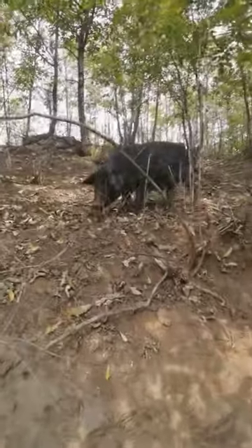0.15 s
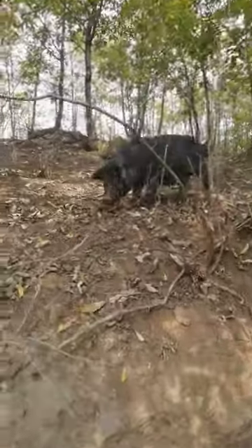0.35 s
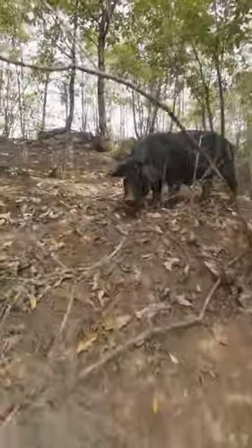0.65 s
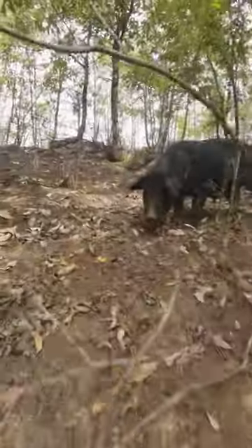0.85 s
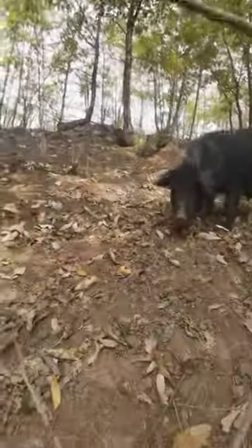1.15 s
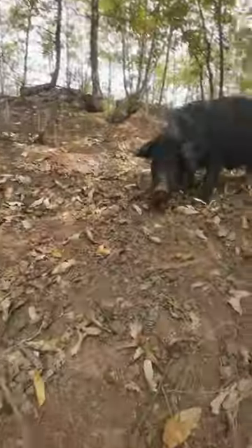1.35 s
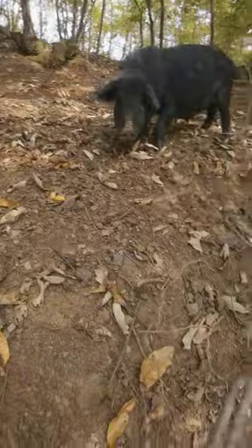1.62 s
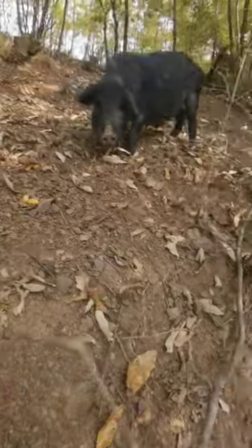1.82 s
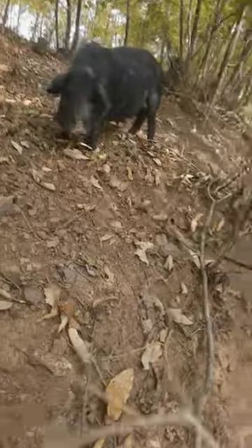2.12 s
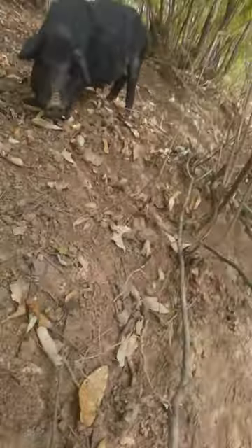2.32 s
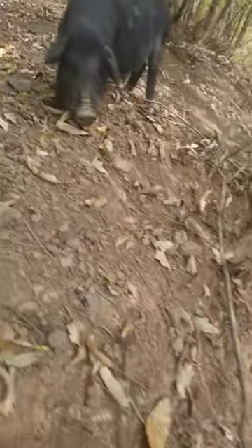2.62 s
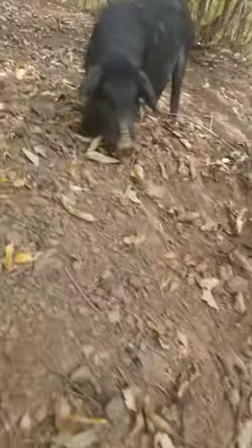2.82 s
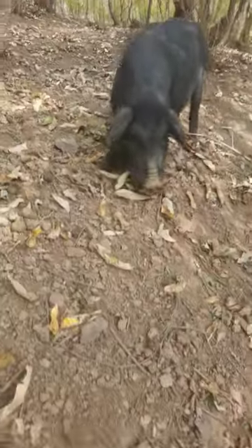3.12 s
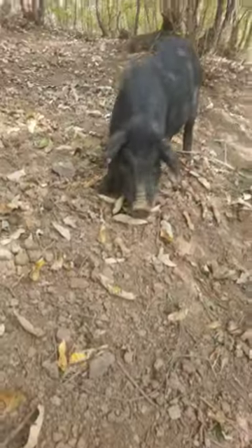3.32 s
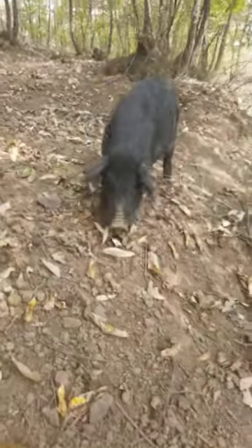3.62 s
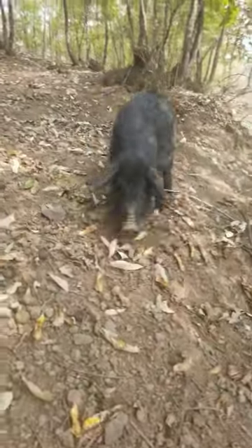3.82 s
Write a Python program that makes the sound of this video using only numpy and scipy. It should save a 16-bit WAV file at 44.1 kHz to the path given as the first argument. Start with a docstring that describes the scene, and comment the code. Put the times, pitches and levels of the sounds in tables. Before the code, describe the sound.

Short, clipped pig grunts, one and later a pair, over scuffing steps in dry forest leaves; sharp crackles cluster midway and again at the end, heard close, in stereo, with almost no reverberation.

```python
"""A pig grunts three times close by: soft flaps of the throat, then a sharp snap and a second one
ring throat and snout, breath flutters through both and the chest booms.
Dry leaves rustle and crack under feet: shaped noise with crumbling grains, scuff swells and short bursts.
Twigs knock and soft thuds fall as decaying sines; a low rumble of filtered noise rises and falls."""
import sys
import numpy as np
from scipy import signal
from scipy.fft import rfft, irfft
from scipy.io import wavfile
from scipy.ndimage import uniform_filter1d, map_coordinates

SR = 44100
rng = np.random.default_rng(int(sys.argv[2]) if len(sys.argv) > 2 else 0)


def attenuation_scalar(level_db):
    """Turn a level in dB into a linear amplitude multiplier (20 dB per decade)."""
    decades = np.asarray(level_db, float) / 20
    return 10 ** decades


def to_wav(s):
    """Save 16-bit WAV."""
    ch = np.atleast_2d(s).T  # columns
    pcm = np.round(np.clip(ch, -1, 1) * 32767)  # PCM
    wavfile.write(sys.argv[1], SR, pcm.astype(np.int16))


N = 174195
T = np.arange(N) / SR


def colour(x, table):
    """Shapes noise by a spectrum of (f/Hz, level/dB) and brings it to rms 1."""
    hz, db = np.array(table).T
    f = np.maximum(np.arange(N // 2 + 1) * SR / N, 1)
    gain = attenuation_scalar(np.interp(np.log(f), np.log(hz), db, left=-200, right=-200))
    y = irfft(rfft(x) * gain, N)
    return y / np.sqrt(np.mean(y ** 2))


def ring(x, modes, pitch, ratio=-1):
    """Excites parallel decaying resonances; each further mode is weighted by another factor of ratio."""
    out = 0
    for k, (hz, db, t60) in enumerate(modes):
        pole = np.exp(2j * np.pi * pitch * hz / SR - np.log(1000) / (t60 * SR))
        out = out + ratio ** k * attenuation_scalar(db) * signal.lfilter([1], [1, -pole], x).imag
    return out


def swell(start, rise, fall):
    """Envelope that rises smoothly, then dies away exponentially."""
    u = T - start
    attack = np.sin(np.pi / 2 * np.clip(u / rise, 0, 1)) ** 2
    return attack * np.exp(-np.maximum(u - rise, 0) / fall)


def decaying_sine(start, hz, t60):
    """A struck body: a sine that starts at zero and loses 60 dB in t60 seconds."""
    u = np.maximum(T - start, 0)
    return np.sin(2 * np.pi * hz * u) * 1000. ** (-u / t60)


def walk(rate):
    """Random wander through rate new points per second, spread 1."""
    k = int(SR / rate)
    w = uniform_filter1d(np.repeat(rng.standard_normal(N // k + 1), k), k)[:N]
    return w / np.std(w)


def pair(a, b, alike):
    """Mixes two unrelated signals into a left and right of given correlation."""
    c = np.clip(alike, 0, 1)
    return np.array([a, c * a + np.sqrt(1 - c * c) * b])


def pan(x, db):
    """Raises left over right by db, half on each side."""
    return x * attenuation_scalar(np.array([db / 2, -db / 2]).reshape(2, -1))


def throat_flaps(snap_s, snap_db, gap, lead_db, soft2_db, sharp2_db):
    """Closures of the throat: blunt pulses for the throat, single-sample clicks for the snout."""
    second_s, lead_fade_db, lead_sharp_db = 0.0275, -3, -12.5
    blunt_s, blunt_db = 0.0012, -8.5
    first_lead_db = lead_db + lead_fade_db
    soft, sharp = np.zeros((2, N))
    for dt, soft_db, sharp_db in [(-2 * gap, first_lead_db, first_lead_db + lead_sharp_db),
                                  (-gap, lead_db, lead_db + lead_sharp_db),
                                  (0, 0, 0),
                                  (second_s, soft2_db, sharp2_db)]:
        i = int((snap_s + dt) * SR)
        soft[i] -= attenuation_scalar(snap_db + soft_db + blunt_db)
        sharp[i] -= attenuation_scalar(snap_db + sharp_db)
    push = np.hanning(int(blunt_s * SR / 4) + 2)
    return np.convolve(soft, push / push.sum())[:N], sharp


def chest_wave(start, pitch):
    """The chest's sine sags to half its starting frequency, then its phase stands still."""
    start_hz, sag_hz_per_s = 92.3, 600  # both scaled by pitch
    u = np.clip(T - start, 0, start_hz / sag_hz_per_s / 2)
    return np.sin(2 * np.pi * pitch * (start_hz * u - sag_hz_per_s * u ** 2 / 2))


def breath(noise, snap_s, db, chest):
    """Air noise swells before the snap, pulses with the chest and breaks off."""
    start_s, rise_s, fall_s = -0.037, 0.02, 0.08  # start counts from the snap
    end_s, stop_s, pulsing_share = 0.092, 0.002, 0.94
    air = noise * attenuation_scalar(db - 24.5) * swell(snap_s + start_s, rise_s, fall_s)
    air = air * (1 - pulsing_share * chest)
    return air * np.exp(-np.maximum(T - snap_s - end_s, 0) / stop_s)


def pig():
    """Flaps and breath excite throat, snout and nostrils; the chest adds a boom, the nose a spectral gap."""
    # grunts: t/s of the snap, snap level/dB, gap/s between lead-in flaps, lead-in level/dB re snap,
    # second flap soft level/dB and sharp level/dB re snap, chest level/dB, relative breath level/dB,
    # pitch factor of throat, snout, nostrils and chest, nostril level/dB
    grunts = [(1.2511, -10, 0.017, -15.5, -3.5, -17, -22, -30, 1.037, -35),
              (3.1656, -11, 0.0165, -7, 0, -24, -20, -27, 1.042, -14),
              (3.599, -11.5, 0.017, -49, 2.5, 4, -23, -30.5, 0.992, 4)]
    # resonances of the throat: f/Hz at pitch factor 1, level/dB, t60/s
    throat = [(149, -1, 0.0376), (267, -7.5, 0.051), (398, -6, 0.053), (523, 0, 0.014), (730, -3.5, 0.021),
              (833, -8.5, 0.032)]
    # resonances of the snout: f/Hz at pitch factor 1, level/dB before the ratio in ring(), t60/s
    snout = [(1610, -21.5, 0.019), (2114, -2.5, 0.024), (2420, -8, 0.01), (3000, -13, 0.0053),
             (3290, -25.5, 0.0045)]
    # resonances of the nostrils: f/Hz at pitch factor 1, level/dB before the nostril level, t60/s
    nostrils = [(3620, -14.5, 0.019), (4850, -13.5, 0.021), (8300, -7.5, 0.012)]
    chest_delay_s, chest_rise_s, chest_fall_s = 0.0115, 0.023, 0.025
    flutter_db, breath_snout_db, puff_s, puff_db = 5, -8, 0.0015, -21
    noise = attenuation_scalar(flutter_db * walk(70)) * rng.standard_normal(N)
    out = 0
    for s, db, gap, lead_db, soft2_db, sharp2_db, chest_db, breath_db, pitch, nostrils_db in grunts:
        soft, sharp = throat_flaps(s, db, gap, lead_db, soft2_db, sharp2_db)
        chest_s = s + chest_delay_s
        chest = chest_wave(chest_s, pitch)
        out = out - attenuation_scalar(chest_db) * swell(chest_s, chest_rise_s, chest_fall_s) * chest
        air = breath(noise, s, breath_db, chest)
        out = out + ring(soft + air, throat, pitch)
        # a ragged puff of air follows each sharp click
        puff = attenuation_scalar(puff_db) * signal.lfilter([1], [1, -np.exp(-1 / (puff_s * SR))], sharp)
        click = np.convolve(sharp, np.hanning(7) / 3)[:N]
        snap = click + puff * rng.standard_normal(N) + air * attenuation_scalar(breath_snout_db)
        out = out + ring(snap, snout, pitch, 0.91)
        out = out + attenuation_scalar(nostrils_db) * ring(snap, nostrils, pitch)
    # the side cavity of the nose takes out a band at 1200 Hz, Q 3.5
    return signal.lfilter(*signal.iirnotch(1200, 3.5, SR), out)


def scuff_power():
    """Feet scuffing through leaves: power of treble and mids swells over a steady floor."""
    # scuffs: start t/s, loudest t/s, end t/s, treble level/dB, mids level/dB, before the uneven wander
    scuffs = [(0.063, 0.214, 0.24, -47, -51.5), (0.263, 0.445, 0.55, -46, -52.5),
              (0.534, 0.684, 0.81, -54, -51), (0.716, 0.843, 1.1, -55, -65), (1.087, 1.107, 1.1, -51, -47),
              (1.29, 1.433, 1.513, -43, -50.5), (1.455, 1.52, 1.69, -52.5, -59),
              (1.677, 1.758, 1.985, -42.5, -52), (1.946, 2.073, 2.288, -40, -48),
              (2.17, 2.317, 2.52, -51, -53), (2.491, 2.544, 2.613, -37, -52.5),
              (2.664, 2.752, 2.88, -48.5, -52.5), (3.115, 3.236, 3.27, -46, -46.5),
              (3.3, 3.322, 3.37, -62.5, -52), (3.453, 3.537, 4.9, -48, -58.5),
              (3.563, 3.69, 3.75, -40, -45.5), (3.727, 3.778, 3.89, -39.5, -48),
              (3.818, 3.885, 4.32, -41, -50.5)]
    bluntness, uneven_db = 1.39, 1
    still_db = np.array([[-58.5], [-64.5]])  # floor of treble and mids
    total = np.ones((2, N)) * attenuation_scalar(2 * still_db)
    for start, top, end, db, mids_db in scuffs:
        shape = np.sin(np.pi / 2 * np.interp(T, [start, top, end], [0, 1, 0])) ** bluntness
        total += (shape * attenuation_scalar(np.array([[db], [mids_db]]))) ** 2
    return total * attenuation_scalar(2 * uneven_db * walk(16))


def crumbling():
    """Four streams of sparse decaying grains roughen the rustle; one flicker is shared by all."""
    crumbs_per_s, spread_db, crumb_s, flicker_db = 450, 2.3, 0.0005, 1.5
    hits = rng.random((4, N)) < crumbs_per_s / SR
    crumbs = hits * attenuation_scalar(spread_db * rng.exponential(size=(4, N)))
    crumbs = signal.lfilter([1], [1, -np.exp(-1 / (crumb_s * SR))], crumbs)
    # steady hiss and crumbs share the power equally
    grain = np.sqrt(1 + crumbs ** 2 / np.mean(crumbs ** 2)) / np.sqrt(2)
    return grain * attenuation_scalar(flicker_db * walk(25.71))


def leaf_cracks():
    """Each leaf creaks briefly, bursts and leaves a longer, weaker tail; returns envelopes and levels."""
    # cracks: t/s, treble peak level/dB, mids level/dB, length/s, centre f/Hz of the treble
    # (levels nominal: the patchy wander and the spectra come on top)
    cracks = [(0.643, -37, -63, 0.0041, 8040), (0.6756, -21.5, -66, 0.0045, 8250),
              (0.751, -31, -70, 0.00067, 8500), (0.768, -28, -75, 0.0006, 10000),
              (0.823, -28, -69, 0.00053, 9000), (0.878, -30, -47.5, 0.00041, 6530),
              (0.885, -28, -66, 0.00063, 9000), (1.0515, -24.5, -50, 0.00058, 7600),
              (1.414, -26, -37, 0.0036, 8050), (1.465, -27.5, -61, 0.0026, 4970),
              (1.7056, -11.5, -34.5, 0.00071, 8700), (1.767, -32, -43, 0.0008, 6000),
              (1.799, -28, -44, 0.0026, 7900), (1.813, -4.5, -23, 0.00041, 4630),
              (1.841, -43, -30.5, 0.00074, 3500), (1.951, -31, -47.5, 0.0014, 4000),
              (1.9816, -28, -37, 0.0011, 7000), (2.245, -20, -34, 0.00059, 5900),
              (2.273, -20, -30.5, 0.00078, 4800), (2.316, -29.5, -45, 0.0048, 4900),
              (2.388, -27.5, -69, 0.003, 8000), (2.525, -12.5, -32, 0.0021, 7240),
              (2.554, -31, -61, 0.0016, 6000), (2.718, -31, -75, 0.0009, 8100),
              (3.108, -32.5, -77, 0.00046, 7000), (3.511, -32.5, -49.5, 0.0034, 8300),
              (3.689, -14.5, -41, 0.0039, 5170), (3.758, -16.5, -38, 0.0022, 7350),
              (3.7758, -8.5, -33, 0.002, 5100), (3.88, -20, -40, 0.00075, 6000)]
    creak_db, tail_db, tail_lengths = -13, -13, 8
    shapes = []
    for t, _, _, length, _ in cracks:
        burst = swell(t, length / 2, length)
        tail = attenuation_scalar(tail_db) * swell(t, length, tail_lengths * length)
        creak = attenuation_scalar(creak_db) * np.exp(-np.abs(T - t) / (2 * length))
        shapes.append(burst + tail + creak)
    _, peak_db, mids_db, _, centre_hz = np.array(cracks).T
    return np.array(shapes), peak_db, mids_db, centre_hz


def twig_knocks():
    """Twigs knock as short decaying sines, equal in both channels."""
    # knocks: t/s, starting level/dB, f/Hz
    knocks = [(0.8215, -27, 2225), (1.951, -20.5, 1310), (2.321, -27, 1020), (2.524, -19.5, 1370),
              (3.515, -35, 820), (3.925, -30, 2469)]
    out = np.zeros((2, N))
    for t, db, hz in knocks:
        out += attenuation_scalar(db) * decaying_sine(t, hz, 0.015)
    return out


def leaves():
    """Leaf noise in half octaves, patchy in pitch, carries scuffs, crumbs and cracks; twigs knock."""
    # spectrum of the leaf treble: f/Hz, relative level/dB
    treble = [(1530, 3.5), (2600, -11), (2960, -7), (4290, -5.5), (5800, -4.5), (7900, -1), (11400, -13),
              (14700, -23.5), (15400, -58), (16000, -26)]
    # spectrum of the leaf mids: f/Hz, relative level/dB
    mids = [(410, -2.5), (700, -5.5), (776, -14), (927, -13), (1080, -6.5), (1370, -2), (1920, 0),
            (3600, -4.5), (4680, -53)]
    # colour of the treble rustle over time: t/s, tilt/(dB per octave) about 6 kHz
    leaf_tilt = [(0, 0), (.7, 3), (1.4, 2.5), (1.75, 2), (2.1, 1), (2.3, -4), (2.55, 2), (3.1, 1),
                 (3.6, 1.5), (3.95, -2.5)]
    alike, patchy_db = 0.3, 2.5
    crest_db, crack_fall_db = 8, 7.5  # peak over rms; fall per squared octave away from the centre
    scuffing, grain = scuff_power(), crumbling()
    shapes, peak_db, mids_db, centre_hz = leaf_cracks()
    tilt_db = np.interp(T, *np.array(leaf_tilt).T)
    half_octave = (np.log2(np.arange(1, N // 2 + 2) * SR / N) * 2).astype(int)
    out = twig_knocks()
    for k, (table, parts) in enumerate(((treble, range(22, 28)), (mids, range(18, 25)))):
        spectrum = rfft(pair(*colour(rng.standard_normal((2, N)), table), alike))
        for p in parts:
            # crumb streams are dealt out to the octaves in turn
            rustle = grain[p // 2 % 4] * np.sqrt(scuffing[k])
            crack_db = mids_db
            if k == 0:
                rustle = rustle * attenuation_scalar(tilt_db * (p - 25) / 2)
                octaves_off = p / 2 + .25 - np.log2(centre_hz)
                crack_db = peak_db - crest_db - crack_fall_db * octaves_off ** 2
            band = irfft(spectrum * (half_octave == p), N) * attenuation_scalar(patchy_db * walk(14))
            out = out + band * (rustle + attenuation_scalar(crack_db) @ shapes)
    return out


def thuds():
    """Soft thuds: low decaying sines, starting downwards."""
    # thuds: t/s, starting level/dB, f/Hz, t60/s
    thud_list = [(2.154, -31, 208, 0.14), (2.248, -28.5, 202, 0.066), (2.321, -26, 191, 0.076),
                 (2.345, -19.5, 279, 0.042), (2.348, -28, 68, 0.18), (2.389, -19.5, 330, 0.0059),
                 (2.409, -32.5, 400, 0.011), (3.786, -24, 105, 0.056)]
    out = 0
    for t, db, hz, t60 in thud_list:
        out = out - attenuation_scalar(db) * decaying_sine(t, hz, t60)
    return out


def rumble():
    """Two bands of low noise rise and fall with a common flicker."""
    # rumble in consecutive stretches: t/s, bass level/dB, low-mids level/dB, before the flicker
    swells = [
        [(0.012, -56, -66), (0.176, -54, -55), (0.356, -53, -68.5), (0.564, -47.5, -64), (0.66, -46, -54),
         (1.2, -49, -63)],
        [(1.36, -45, -50), (1.67, -52, -77), (1.76, -39, -44.5), (1.92, -52.5, -61.5), (2.12, -38.5, -44.5),
         (2.26, -40.5, -47.5), (2.378, -35, -50), (2.46, -46.5, -62), (2.626, -52.5, -68.5),
         (2.744, -49.5, -43), (2.86, -50.5, -68.5), (3.11, -53, -72)],
        [(3.28, -47, -75), (3.308, -56, -60), (3.332, -49, -45), (3.426, -56, -78), (3.524, -53, -58.5),
         (3.56, -53, -64)],
        [(3.72, -49, -40), (3.762, -44, -63), (3.794, -43, -47), (3.844, -47.5, -61), (3.89, -46.5, -48.5),
         (3.916, -44.5, -76), (3.95, -71, -55)],
    ]
    # spectrum of the bass: f/Hz, relative level/dB
    bass = [(20, -18), (42, 8), (60, 4), (95, 8.5), (165, 0), (211, -3.5), (283, -9), (330, -15.5),
            (430, -16.5)]
    # spectrum of the low mids: f/Hz, relative level/dB
    low_mids = [(130, -19), (220, -3.5), (284, -14), (312, -8), (521, -13), (950, -15), (1430, -30)]
    flicker_db, alike, still_low_mids_db = 2.5, 0.55, -76.5
    s, bass_db, mids_db = np.concatenate(swells).T
    mids_db = np.maximum(mids_db, still_low_mids_db)
    flicker = flicker_db * walk(30.03)
    out = 0
    for table, band_db in ((bass, bass_db), (low_mids, mids_db)):
        noise = pair(*colour(rng.standard_normal((2, N)), table), alike)
        out = out + noise * attenuation_scalar(np.interp(T, s, band_db) + flicker)
    return out


def scene():
    """Pig near the centre with a faint ground echo; leaves, thuds and rumble shift in level and lag."""
    # where the steps are heard: t/s, left over right level/dB, lag/s of the left port
    steps_side = [(0, 0.5, 0.00035), (1, -4, 0.00055), (1.4, 0.5, 0.00043), (2.3, -6, 0.00048),
                  (3.098, 0.5, 0.000486), (3.4, 0, 0.000021), (3.95, 1, 0.000023)]
    voice = pig()
    # the echo arrives later on the right and with opposite sign
    echo = attenuation_scalar(-19.0) * np.array([np.roll(voice, int(0.00171 * SR)), -np.roll(voice, int(0.0029 * SR))])
    s, side_db, lag = np.array(steps_side).T
    steps = leaves() + rumble() + thuds()
    left, right = pan(steps, np.interp(T, s, side_db))
    left = map_coordinates(left, [(T - np.interp(T, s, lag)) * SR], mode="mirror")
    pig_lag_s = 0.00007  # the right port hears the pig later
    voice = np.array([voice, np.roll(voice, round(pig_lag_s * SR))])
    return pan(voice + echo, 1.0) + np.array([left, right])


def roll_off(x):
    """The treble ends steeply here."""
    return signal.sosfilt(signal.butter(12, 16490, fs=SR, output="sos"), x)


def record(dry):
    """The microphone loses the deepest bass, below 40 Hz."""
    mix = signal.sosfilt(signal.butter(2, 40, "high", fs=SR, output="sos"), dry)
    return roll_off(mix)


dry = scene()
out = record(dry)
to_wav(out)
```